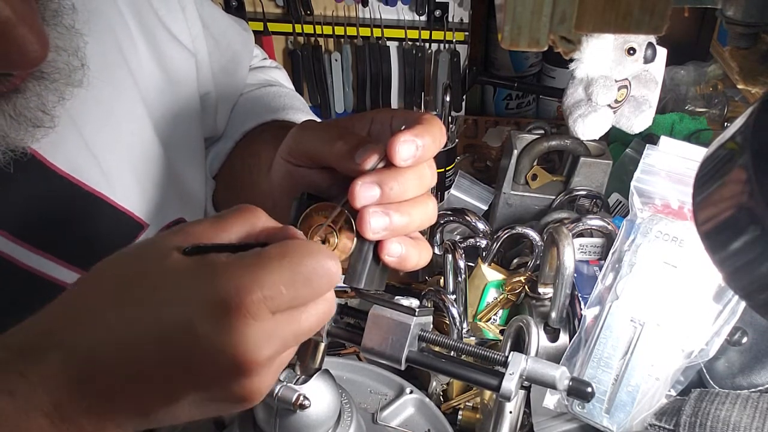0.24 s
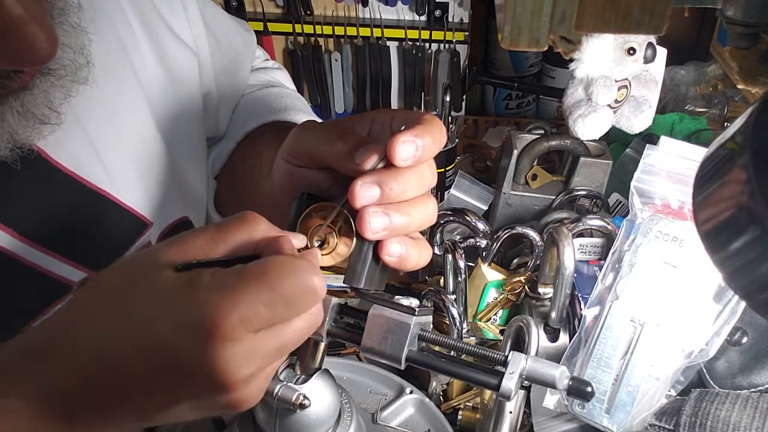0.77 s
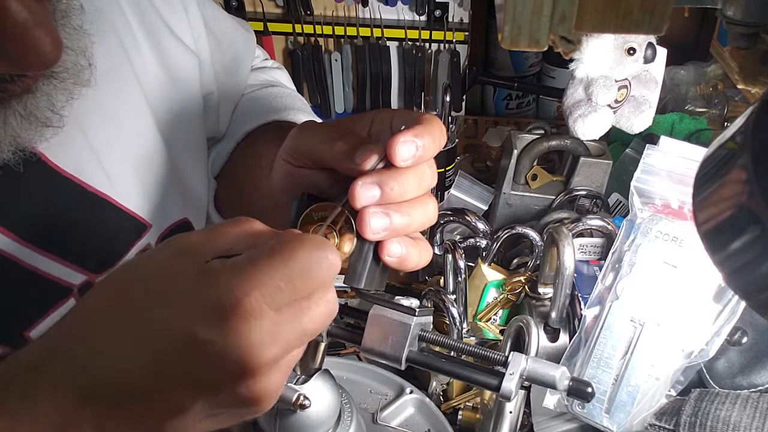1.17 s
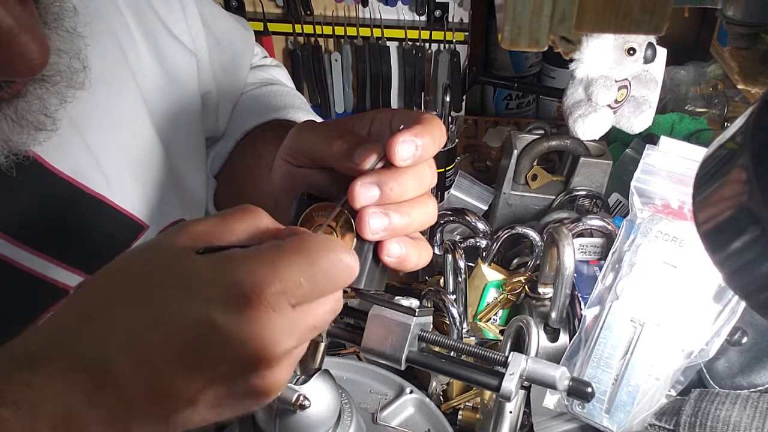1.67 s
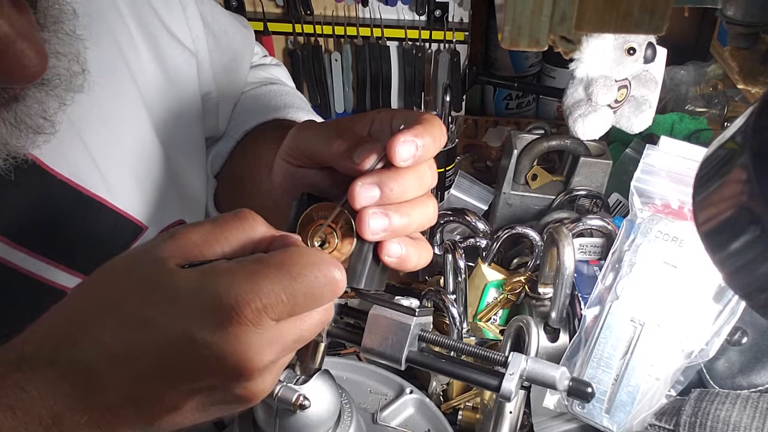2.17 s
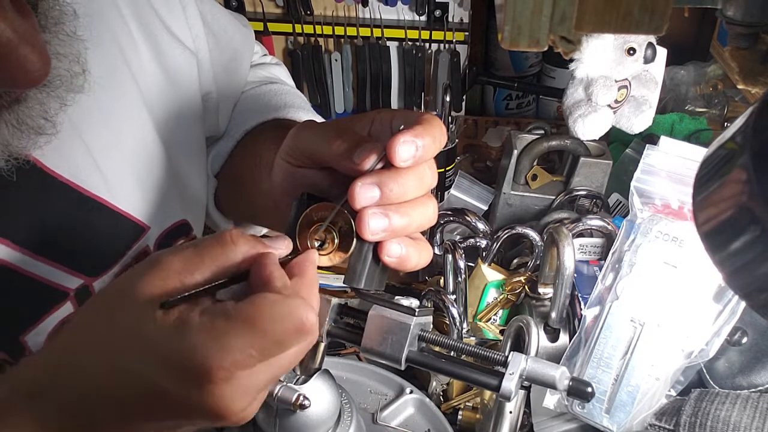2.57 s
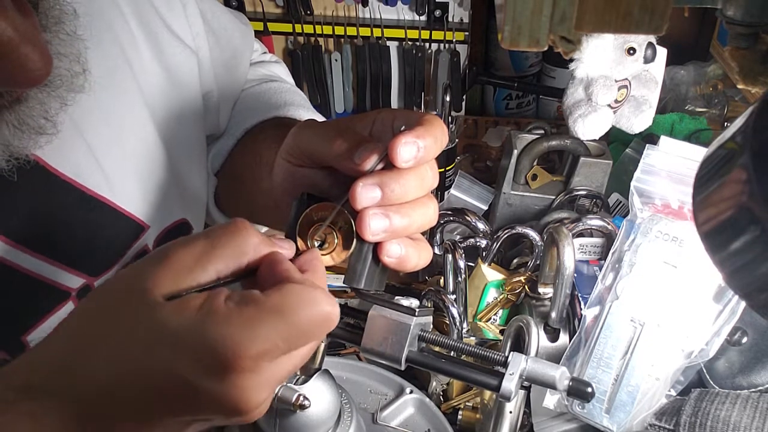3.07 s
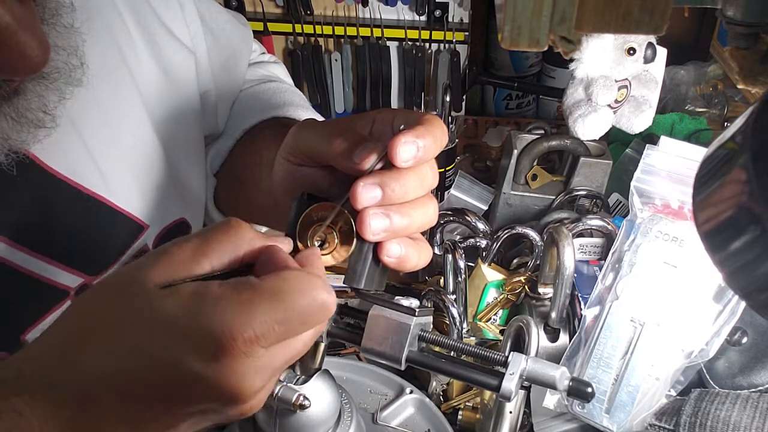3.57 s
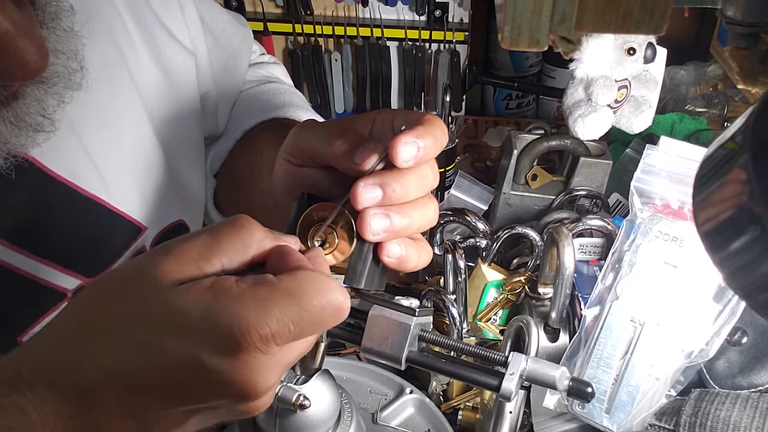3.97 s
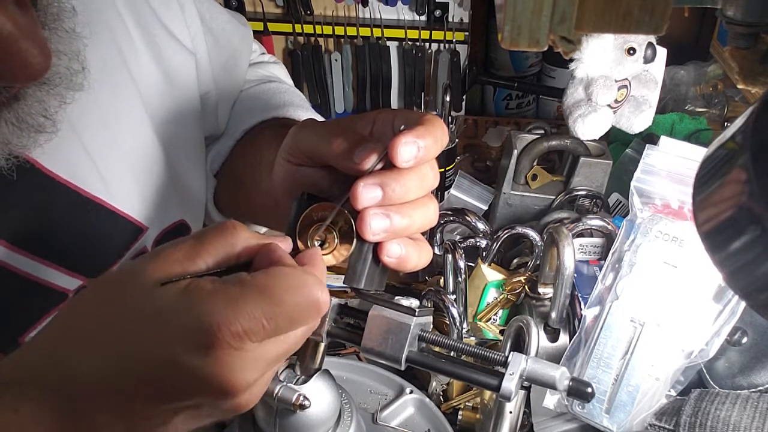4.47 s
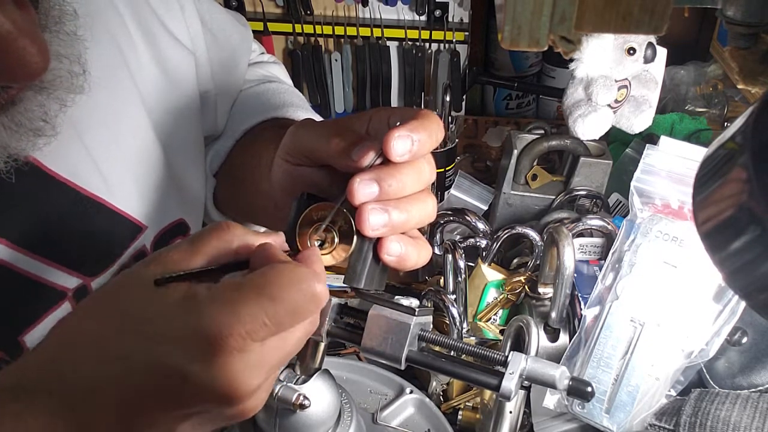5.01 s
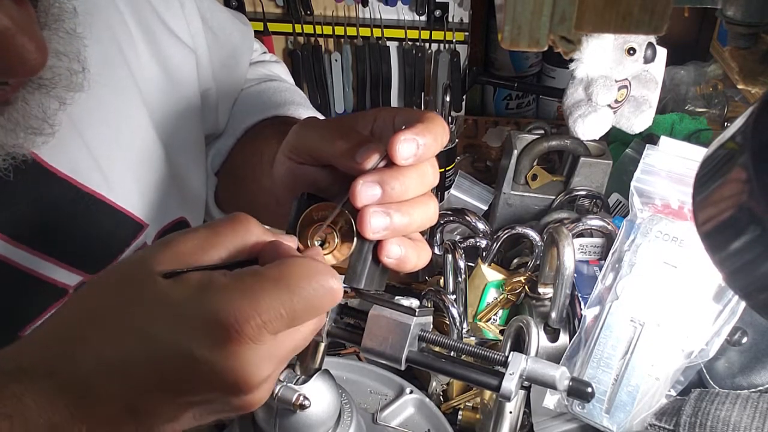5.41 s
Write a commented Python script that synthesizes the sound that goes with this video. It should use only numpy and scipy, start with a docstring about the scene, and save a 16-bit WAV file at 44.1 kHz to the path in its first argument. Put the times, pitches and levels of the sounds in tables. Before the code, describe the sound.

A pick works inside a brass lock cylinder, close to the microphone in a small workshop. Faint, high scratching and tiny squeaks run throughout as it sticks and slips on the pins. At about 0.5 seconds a pin snaps loudly, a dry crack with a brief metal ring. The lock knocks softly in the hand between 1.1 and 1.4 seconds. A smaller click with a dull knock comes at 2.2 seconds, then light ticks and knocks around 2.8, and another tick with a soft finger rub at 3.7. The loudest snap lands at 4.3 seconds, and one last thin tick follows at 5.3 as the scratching dies down. Underneath the whole time is a low electrical hum that gently swells and fades, with a low room rumble, hiss and a thin buzz.

```python
"""Picking a brass lock

A pick works the pins of a lock cylinder, close by in a small workshop. It scrapes and squeaks
faintly as it sticks and slips on the brass, and the lock knocks dully in the hand. Two pins snap
loudly into place among softer ticks, each a crack with a brief metal ring. Underneath run a low
rumble, hiss, a thin buzz and a mains hum that slowly swells and fades against a motor."""
import sys
import numpy as np
from scipy import signal
from scipy.fft import rfft, irfft
from scipy.io import wavfile
from scipy.ndimage import map_coordinates

SR = 44100
rng = np.random.default_rng(int(sys.argv[2]) if len(sys.argv) > 2 else 0)


def bounce(signal):
    """Save signal as a 16-bit WAV file at the path given by the first command-line argument."""
    frames = np.transpose(np.atleast_2d(signal))
    limited = np.clip(frames, -1, 1)
    pcm = np.round(limited * 32767).astype(np.int16)
    wavfile.write(sys.argv[1], SR, pcm)


N = 249165


def gain(db):
    """Turns decibels into a number to multiply by."""
    return 10 ** (np.asarray(db) / 20)


def unit_level(sound):
    """Scales a sound to an average (rms) level of 1."""
    return sound / np.sqrt(np.mean(sound ** 2) + 1e-20)


def value_at(curve, hz):
    """Looks up a pitch in rows of (pitch_hz, value), blending between rows."""
    pitches, values = np.transpose(curve)
    return np.interp(np.log(hz + 1), np.log(pitches + 1), values)


def shape_tone(sound, curve):
    """Turns lows and highs up or down by rows of (pitch_hz, gain_db)."""
    size = sound.shape[-1]
    return irfft(rfft(sound) * gain(value_at(curve, np.fft.rfftfreq(size, 1 / SR))), size)


def resonate(drive, hz, width_hz):
    """Makes a sound ring around one pitch; a smaller width gives a purer note."""
    size = drive.shape[-1]
    off_pitch = (np.fft.rfftfreq(size, 1 / SR) - hz) / width_hz
    return irfft(rfft(drive) / (1 + .6j * off_pitch) ** 4, size)


def add(mix, start_s, sound):
    """Adds a sound to the mix at its start time."""
    part = mix[..., round(start_s * SR):][..., :sound.shape[-1]]
    part += sound[..., :part.shape[-1]]


def room(sound, ring_s, echo_db, gap_s=0.0013):
    """Adds a wash of echoes, different on each side. A ring time is the time to fade by 60 dB."""
    t = np.arange(SR // 2) / SR
    tail = rng.standard_normal((2, len(t))) * gain(-60 * t / ring_s) * (t > gap_s)
    tail /= np.linalg.norm(tail, axis=1, keepdims=True)
    return sound + gain(echo_db) * signal.fftconvolve(sound, tail, axes=1)[:, :N]


def rub(length_s, hz, width_hz, slips_per_s=500, grit=0.6, ramp_s=0.0052, fade_db=-5):
    """Tiny slips make a rubbed surface ring: a narrow ring squeaks, a wide one scratches."""
    t = np.arange(8192) / SR
    slips = rng.standard_normal(len(t)) * (rng.random(len(t)) < slips_per_s / SR)
    friction = grit * unit_level(slips) + rng.standard_normal((2, len(t)))
    ring = resonate(friction, hz, 0.6 * width_hz)
    fade_in = np.clip(t / ramp_s, 0, 1)
    fade_out = np.clip((length_s - t) / ramp_s + 1, 0, 1)
    ring *= fade_in * fade_out * gain(fade_db * t / length_s)
    return ring * np.sqrt(length_s * SR / np.sum(ring ** 2, axis=1, keepdims=True))


# The tone of the room's rumble: pitch_hz, gain_db
RUMBLE_TONE = [(20, -14), (45, -2), (90, -1), (130, 4.5), (160, -1), (205, -11.5), (300, -16.5), (370, -15),
               (445, -19.5), (560, -27.5), (850, -34.5), (1300, -28), (2300, -26.5), (4500, -52.5)]
# How alike the rumble is on the left and right: pitch_hz, likeness (0 to 1)
RUMBLE_LIKENESS = [(60, .995), (150, .98), (300, .9), (600, .7), (1500, .45), (4000, .2)]
def rumble(level_db=-52.5):
    """Low room noise; its deepest part is nearly the same on both sides."""
    left, other = rfft(rng.standard_normal((2, N)))
    likeness = value_at(RUMBLE_LIKENESS, np.fft.rfftfreq(N, 1 / SR))
    right = likeness * left + np.sqrt(1 - likeness ** 2) * other
    noise = irfft(np.array([left, right]), N)
    return gain(level_db) * unit_level(shape_tone(noise, RUMBLE_TONE))


# The tone of the microphone's hiss: pitch_hz, gain_db
HISS_TONE = [(800, -9.5), (2500, -7), (4500, -13.5), (6000, -9), (7500, -2), (8500, -10), (9500, 2.5),
             (10200, -4.5), (10600, -5), (11000, 4.5), (12500, 1.5), (16000, 3.5)]
MAINS_HZ = 59.972  # cycles per second of the electricity supply
def hiss(level_db=-52.5, sizzle_db=-62, sizzle_hz=10100, width_hz=550):
    """Smooth microphone hiss, plus a high sizzle that pulses with the mains."""
    smooth = unit_level(shape_tone(rng.standard_normal((2, N)), HISS_TONE))
    pulse = np.cos(np.pi * MAINS_HZ * np.arange(N) / SR) ** 2
    band = np.exp(-.5 * ((np.fft.rfftfreq(N, 1 / SR) - sizzle_hz) / width_hz) ** 2)
    sizzle = irfft(rfft(rng.standard_normal((2, N))) * band, N)
    return gain(level_db) * smooth + gain(sizzle_db) * unit_level(pulse * sizzle)


# The tone of the thin buzz: pitch_hz, gain_db
BUZZ_TONE = [(500, -34), (900, -25), (1500, -10), (2200, 9.5), (2600, -94), (3200, 7), (4300, -1),
             (6500, -2), (7600, 17.5), (8500, 4), (10200, 7), (12000, -7)]
def buzz(level_db=-69, ring_s=0.028):
    """Every mains cycle sets off the same short rattle, so fast that it blurs into a buzz."""
    cycle_t = np.arange(round(SR / MAINS_HZ)) / SR
    rattle = rng.standard_normal((2, len(cycle_t))) * gain(-60 * cycle_t / ring_s)
    place_in_cycle = (np.arange(N) / SR * MAINS_HZ % 1) * len(cycle_t)
    looped = [map_coordinates(side, [place_in_cycle], order=5, mode="grid-wrap") for side in rattle]
    return gain(level_db) * unit_level(shape_tone(np.array(looped), BUZZ_TONE))


# The hum's higher notes: multiple_of_mains, left_db, right_db
HUM_OVERTONES = [(2, -55, -56), (3, -59, -58), (4, -66, -77), (5, -78, -72), (9, -84, -78), (10, -77, -70),
                 (11, -89, -78), (21, -74, -74), (22, -90, -79), (23, -80, -81), (24, -76, -83),
                 (26, -76, -77), (27, -70, -84), (28, -89, -72), (29, -78, -76), (34, -95, -77),
                 (51, -79, -94), (52, -70, -96), (53, -70, -92)]
def hum(mains_db=-41.2, motor_db=-56, beat_hz=0.757, first_swell_s=.83, waver=0.1):
    """The mains hum swells and fades as a slightly slower motor drifts in and out of step."""
    t = np.arange(N) / SR
    angle = 2 * np.pi * MAINS_HZ * t
    head_start = np.array([[.2], [-.2]])  # radians: the left side is a little early
    motor_lag = 2 * np.pi * beat_hz * (t - first_swell_s)
    out = gain(mains_db) * np.cos(angle + head_start)
    out += gain(motor_db) * np.cos(angle - motor_lag + head_start)
    out *= gain([[0.23], [-0.23]])  # a touch louder on the left
    drift_times = np.linspace(0, t[-1], num=40)
    for multiple, left_db, right_db in HUM_OVERTONES:
        drift = 1 + waver * np.interp(t, drift_times, rng.standard_normal(len(drift_times)))
        # low overtones flatten the wave's top; the rest bunch into a smeared pulse each cycle
        offset = np.pi if multiple < 5 else -.06 * multiple ** 2
        out += gain([[left_db], [right_db]]) * drift * np.cos(multiple * angle + offset + head_start)
    return np.sqrt(2) * out


# The fingers shift their grip: start_s, length_s, pitch_hz, width_hz, level_db
FINGER_RUBS = [(3.7, .1, 148, 40, -47), (3.71, .07, 380, 50, -60)]
def grip():
    """Skin drags on the lock body with a soft, low puff."""
    out = np.zeros((2, N))
    for start_s, length_s, hz, width_hz, level_db in FINGER_RUBS:
        add(out, start_s, gain(level_db) * rub(length_s, hz, width_hz)[0])
    return out


def slide_on_brass(length_s, hz):
    """One short slide of the pick: the higher its pitch, the wider its hiss."""
    return rub(length_s, hz, width_hz=940 * (hz / 5000) ** 1.37)


# How hard the pick brushes the pins: time_s, gain_db
BRUSH_PRESSURE = [(0, 2), (.5, 3), (1.2, -0.5), (1.9, 3.5), (2.3, -8), (2.6, -0.5), (3.7, -1), (4.1, -1),
                  (4.9, -4), (5.3, 0), (5.65, -17)]
# The tone of the brushing: pitch_hz, gain_db
BRUSH_TONE = [(2000, -10), (3000, -11.5), (5000, -9.5), (8500, -4.5), (13000, 2.5)]
def brushing(count=170, base_db=-63.0, spread_db=7):
    """The pick keeps brushing the pins with light, random touches; higher ones are shorter."""
    out = np.zeros((2, N))
    for index, (late, height, force) in enumerate(rng.random((count, 3))):
        start_s = (index + late) / count * (N - 1) / SR
        touch = slide_on_brass(length_s=.06 - .04 * height, hz=2000 * 7.5 ** height)
        pressure_db = np.interp(start_s, *np.transpose(BRUSH_PRESSURE))
        add(out, start_s, gain(base_db + pressure_db + spread_db * force) * touch)
    return room(shape_tone(out, BRUSH_TONE), ring_s=.15, echo_db=-6)


# The pick's clearer slides: start_s, length_s, pitch_hz, level_db
PICK_SCRAPES = [(0.344, 0.16, 13400, -57), (0.424, 0.12, 4750, -65), (.652, 0.06, 11400, -55.5),
                (.68, 0.059, 3600, -63.5), (0.978, 0.11, 8150, -60.5), (1.201, 0.051, 4440, -64.5),
                (1.203, .033, 12900, -57), (1.65, .037, 13100, -55), (2.535, 0.076, 3530, -64.5),
                (2.638, .045, 7600, -59.5), (2.727, .02, 9900, -51.5), (2.829, 0.025, 11200, -50),
                (3.431, 0.053, 12700, -56), (3.67, 0.036, 13100, -51.5), (5.254, .011, 13200, -48),
                (5.27, .029, 4930, -62.5)]
def scrapes(right_db=-2):
    """The pick's clearer, louder slides along the pins, each with a broad hiss."""
    out = np.zeros((2, N))
    for start_s, length_s, hz, level_db in PICK_SCRAPES:
        add(out, start_s, gain(level_db) * slide_on_brass(length_s, hz))
    return room(out * gain([[0], [right_db]]), ring_s=.17, echo_db=-4)


def glide(sound, length_s, hz, octaves):
    """Bends a sound's pitch up or down, passing through hz halfway along."""
    from_middle = np.minimum(np.arange(sound.shape[-1]) / SR / length_s, 1) - .5
    shift_hz = hz * (2 ** (octaves * from_middle) - 1)
    return (signal.hilbert(sound) * np.exp(2j * np.pi * np.cumsum(shift_hz) / SR)).real


# The pick's squeaks: start_s, length_s, pitch_hz, glide_octaves, level_db
PICK_SQUEAKS = [(.317, .024, 1590, -0.41, -55.5), (.504, 0.017, 1293, -0.056, -43.5),
                (0.824, 0.068, 1366, -.05, -58.5), (0.929, 0.039, 1573, 0.022, -51.5),
                (1.007, 0.07, 2190, 0.12, -58), (1.461, 0.02, 2300, 0.086, -52),
                (1.511, 0.087, 1276, 0.067, -57.5), (1.619, 0.034, 1070, 0.0072, -66.5),
                (1.662, 0.026, 1410, 0.4, -54), (1.906, .043, 1595, -.1, -59.5),
                (2.495, 0.038, 1270, 0.092, -53), (2.569, 0.026, 1980, 0.55, -51),
                (3.067, 0.04, 1810, 0.34, -60), (3.672, 0.029, 1585, -0.11, -58),
                (3.752, .016, 2250, 0.14, -59.5), (3.798, 0.03, 1530, -0.094, -57),
                (4.212, 0.101, 1210, .2, -59), (4.579, .11, 1306, -.05, -66.5),
                (4.941, 0.098, 2200, .3, -63.5), (5.475, .07, 1396, -0.0058, -65)]
def squeaks(still_width=0.056, rasp_per_octave=0.4, right_db=-2):
    """The pick sticks and slips on a pin: in one spot it rings, on the move it glides and rasps."""
    out = np.zeros((2, N))
    for start_s, length_s, hz, octaves, level_db in PICK_SQUEAKS:
        width_hz = hz * (still_width + rasp_per_octave * abs(octaves))
        squeak = glide(rub(length_s, hz, width_hz), length_s, hz, octaves)
        add(out, start_s, gain(level_db) * squeak)
    return room(out * gain([[0], [right_db]]), ring_s=.17, echo_db=-4)


# The lock knocks in the hand: start_s, level_db
LOCK_KNOCKS = [(0.523, -42.5), (1.0957, -51), (1.2084, -44.5), (1.2349, -44), (1.4228, -49), (2.1745, -31),
               (2.208, -42), (2.413, -49.5), (2.848, -45), (2.873, -40.5), (2.896, -42.5), (3.606, -42.5),
               (3.9415, -47), (4.3086, -36)]
# The low notes of the lock body: pitch_hz, gain_db, ring_s
BODY_NOTES = [(335, -20, 0.1), (441.6, 1.5, 0.073), (501.5, -7.5, 0.06), (651, -15, 0.048)]
def knocks(rise_s=0.0039, tuning_spread=0.024):
    """The lock body thuds against the fingers, which quickly muffle its few low notes."""
    out = np.zeros((2, N))
    t = np.arange(SR // 5) / SR
    for start_s, level_db in LOCK_KNOCKS:
        tunings = 1 + tuning_spread * rng.standard_normal(len(BODY_NOTES))
        ring = sum(gain(note_db - 60 * t / ring_s) * np.sin(2 * np.pi * hz * tuning * t)
                   for (hz, note_db, ring_s), tuning in zip(BODY_NOTES, tunings))
        add(out, start_s, gain(level_db) * ring * (1 - np.exp(-t / rise_s)))
    return room(out, ring_s=0.75, echo_db=-19.0)


# Pins that snap or tick: start_s, level_db, chatter (0 to 1, how much the pin bounces)
PIN_SNAPS = [(0.5217, -16.5, 0.1), (2.1735, -27, 0.5), (2.735, -41, 0.2), (2.8337, -28.5, 0.3),
             (3.675, -33, .4), (4.3072, -6.5, 0.3), (5.3446, -33, 0)]
# The tone of a pin's hit: pitch_hz, gain_db
HIT_TONE = [(250, -24), (600, -11), (950, -19), (1400, -14), (1900, -8), (2800, -13), (4200, -21),
            (5300, -14), (6400, -6), (8300, -16), (10000, -6), (12000, -5), (14500, 0), (16000, 0)]
# The bounces after each hit: delay_s, gain_db
PIN_BOUNCES = [(.0016, 0), (.003, -3), (.0042, -1)]
# The ringing of the cylinder and pick: pitch_hz, width_hz, gain_db, ring_s
METAL_NOTES = [(676, 310, -34, 0.038), (1860, 400, -26, 0.055), (2480, 970, -39, 0.15),
               (7160, 530, -35, 0.1), (14260, 1900, -14.5, 0.047)]
def pin_snaps(hit_fade_s=0.0058, rise_s=0.00045, right_db=-10, bench_delay_s=0.0053, bench_db=-4.5):
    """A pin cracks against the brass, bounces and rings briefly; the bench echoes it to the right."""
    out = np.zeros((2, N))
    t = np.arange(4096) / SR
    fade = gain(-60 * t / hit_fade_s)
    for start_s, level_db, chatter in PIN_SNAPS:
        hit = shape_tone(rng.standard_normal((2, len(t))), HIT_TONE) * fade
        hit *= np.linalg.norm(fade) / np.linalg.norm(hit, axis=1, keepdims=True)
        snap = hit.copy()
        for delay_s, bounce_db in PIN_BOUNCES:
            add(snap, delay_s, chatter * gain(bounce_db) * hit)
        for hz, width_hz, note_db, ring_s in METAL_NOTES:
            note = resonate(rng.standard_normal((2, len(t))), hz, width_hz)
            snap += gain(note_db - 60 * t / ring_s) * unit_level(note)
        # a chattering pin shakes the whole cylinder; a clean tick stays thin
        lows_db = 14 * (chatter - .5)
        snap = shape_tone(snap, [(2500, lows_db), (5000, 0)])
        snap *= gain(level_db) * (1 - np.exp(-t / rise_s)) * (1 - t / t[-1])
        add(out, start_s, snap * gain([[0], [right_db]]))
        add(out[1], start_s + bench_delay_s, gain(bench_db) * snap[0])
    return room(out, ring_s=.16, echo_db=-20)


# The right microphone opening, which misses parts of the treble: pitch_hz, gain_db
RIGHT_MIC_TONE = [(250, -2), (600, 6.5), (1000, -1), (2400, -2), (3200, -0.5), (4600, -3.5), (5500, -12.5),
                  (7800, -25), (8500, 0.5), (10000, 3), (10800, 1.5), (12900, -4.5), (13300, 0.5),
                  (16000, -39)]
def scene():
    """The lock over the room's noise; on the right, all but the hum takes on that side's tone."""
    lock = squeaks() + scrapes() + brushing() + grip() + pin_snaps() + knocks()
    left, right = lock + rumble() + buzz() + hiss()
    return np.array([left, shape_tone(right, RIGHT_MIC_TONE)]) + hum()


def record(dry):
    """Cuts off the very highest treble, above 15850 Hz."""
    treble_cut = signal.firwin(511, 15850, window=("kaiser", 9), fs=SR)
    return signal.oaconvolve(dry, treble_cut[None], "same")


dry = scene()
out = record(dry)
bounce(out)
```